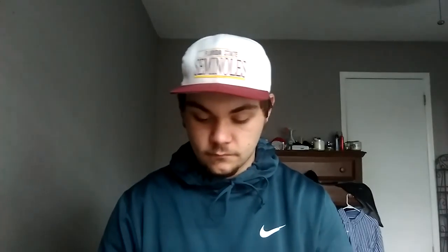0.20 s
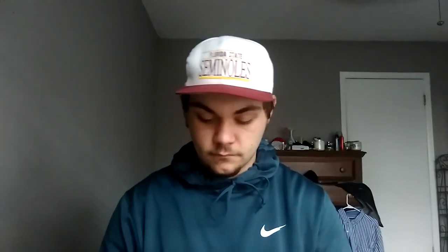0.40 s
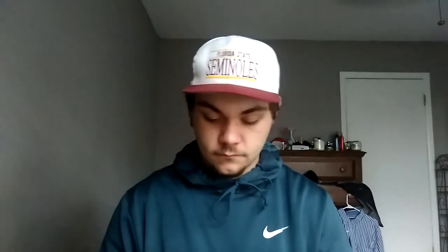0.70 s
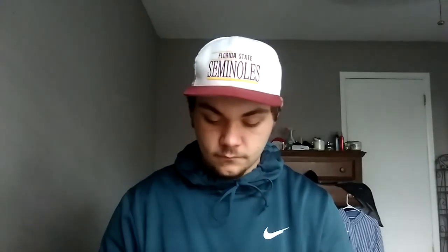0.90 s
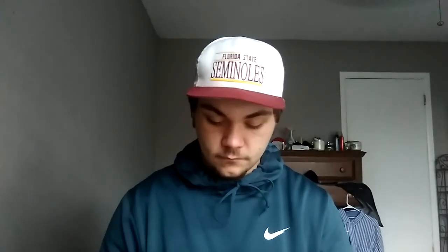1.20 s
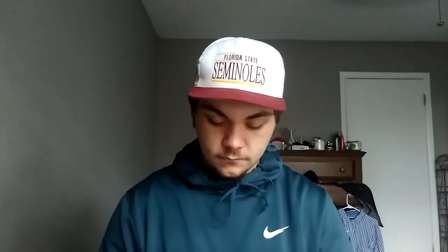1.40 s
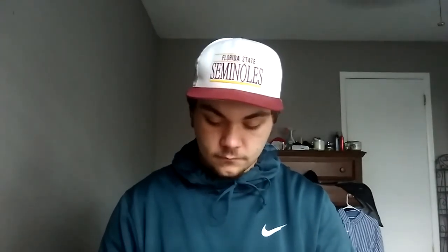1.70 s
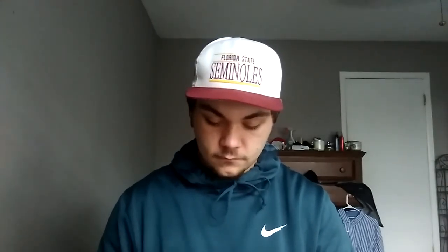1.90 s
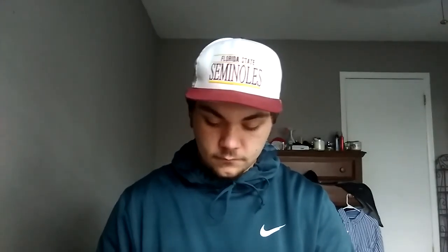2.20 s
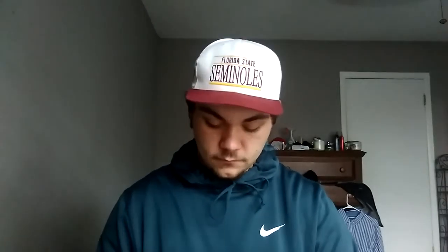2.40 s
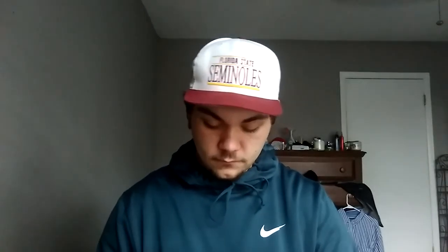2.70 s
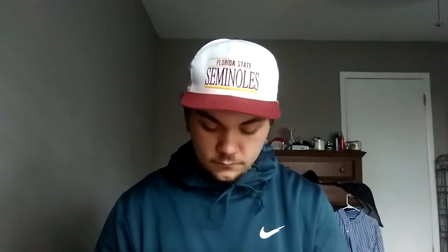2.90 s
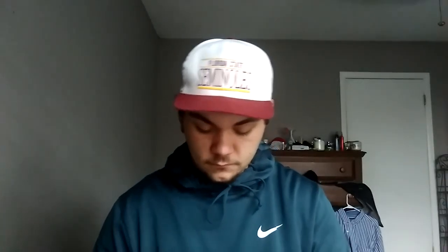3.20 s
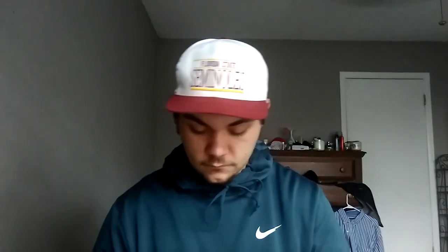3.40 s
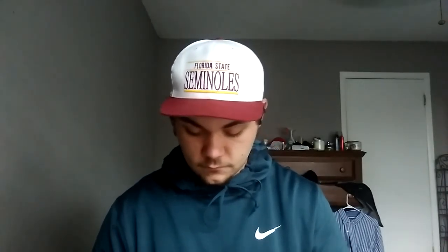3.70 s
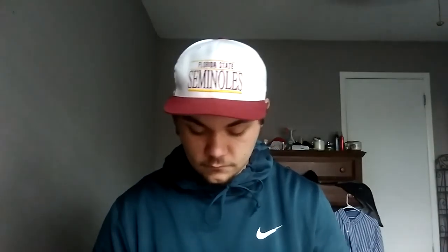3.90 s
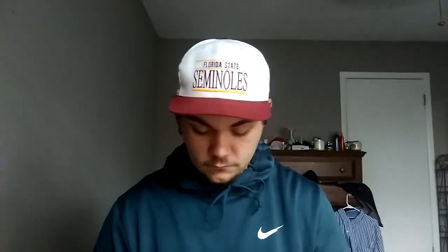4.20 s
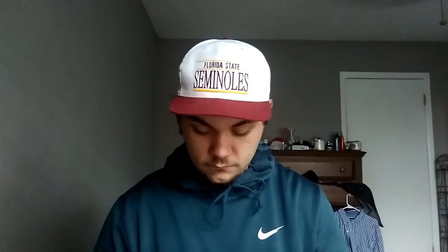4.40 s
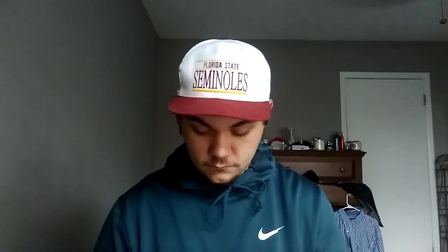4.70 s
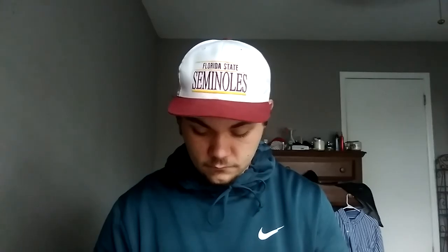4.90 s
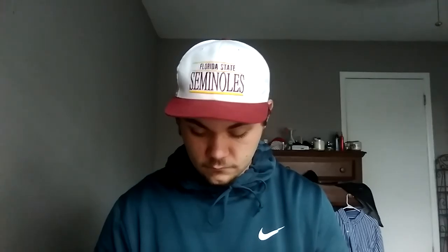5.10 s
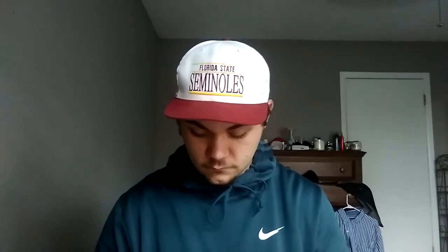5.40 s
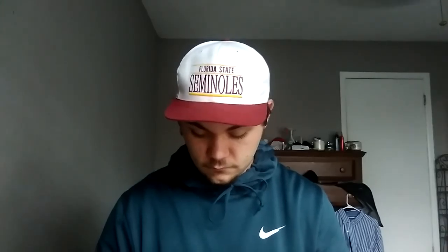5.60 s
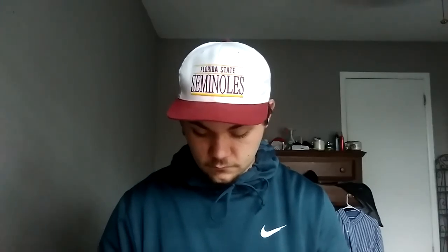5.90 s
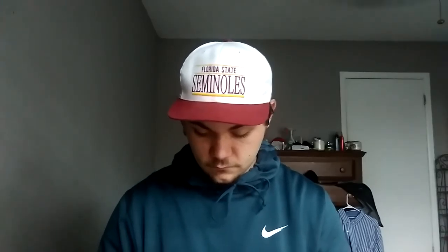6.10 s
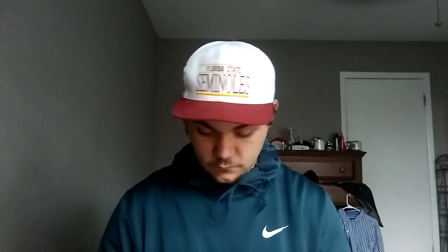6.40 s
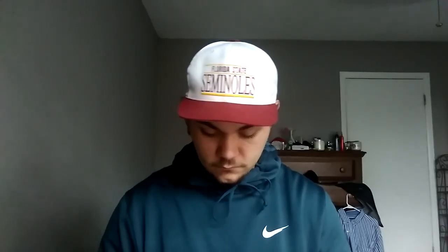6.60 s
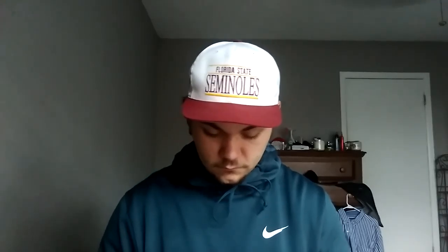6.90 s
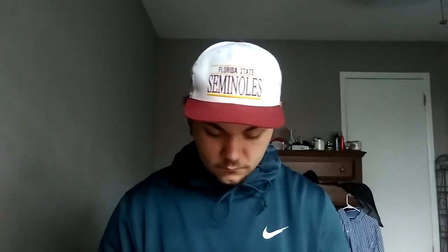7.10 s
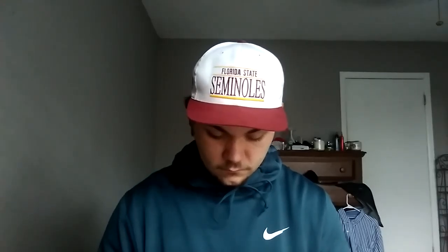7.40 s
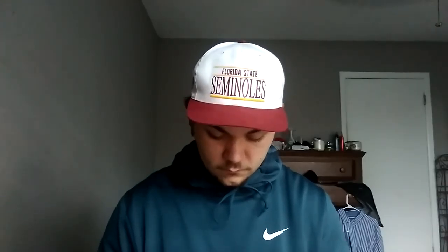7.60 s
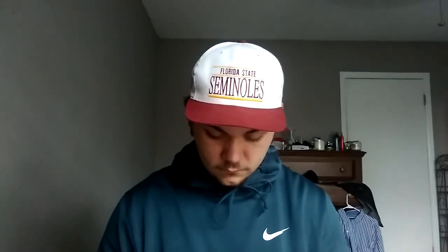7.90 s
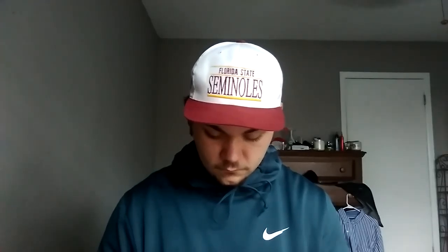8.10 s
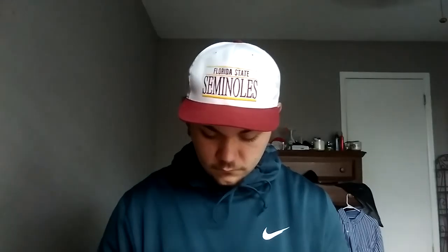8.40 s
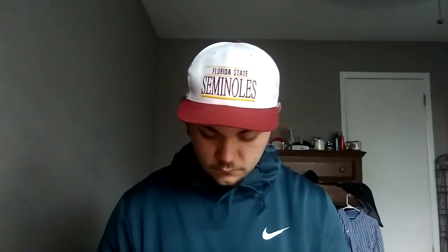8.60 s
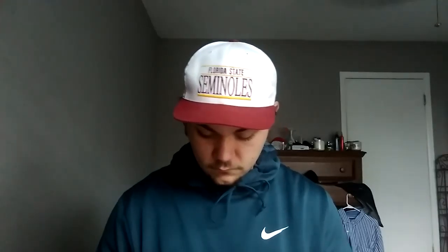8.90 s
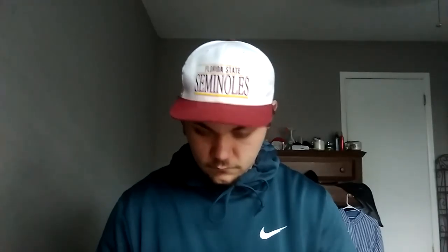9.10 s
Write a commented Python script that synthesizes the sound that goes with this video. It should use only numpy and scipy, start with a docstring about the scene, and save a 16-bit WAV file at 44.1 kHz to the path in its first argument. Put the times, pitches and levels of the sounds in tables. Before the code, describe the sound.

Hands work a paper envelope close to a small microphone in a quiet bedroom, the paper brighter and louder on the left. A short rustle and snap come at about 0.4 seconds, then the sharpest cluster of cracks at 1.2. Hissing slides and crinkles swell from 2.1 to 2.6 seconds. From 3 to 5 seconds, short uneven strokes follow one another, with crease snaps, hollow flaps of the open pocket and soft hand bumps. Stronger, bright tearing strokes come at about 5.4, 6.5 and 7.5 seconds, with small snaps between them. After 8 seconds only light sliding remains, ending just after 9. Faint mains hum and a low, steady room hush lie beneath everything. At about 6.2 seconds a motor spins up into a deep, wavering tone, strongest until 7.5 seconds, then easing and continuing to the end.

```python
"""Paper hisses, crinkles and snaps up close as hands turn and open an envelope in a quiet bedroom.
The hiss is tiny fibres catching and letting go as the paper slides and tears. The bending sheet buckles,
its creases snap, its open pocket sounds hollow, and the hands bump it softly. Behind it are mains hum,
steady room noise and a low motor that spins up towards the end. A small microphone hears all this through
two openings (ports), left and right."""
import sys
import numpy as np
from scipy import signal
from scipy.fft import rfft, irfft, next_fast_len
from scipy.io import wavfile
from scipy.ndimage import map_coordinates

SR = 44100
rng = np.random.default_rng(int(sys.argv[2]) if len(sys.argv) > 2 else 0)


def dump(signal):
    """Clip the signal to [-1, 1] and save it as 16-bit WAV at the path in sys.argv[1]."""
    limited = np.clip(np.atleast_2d(signal).T, -1, 1)
    pcm = np.round(limited * 32767).astype(np.int16)
    wavfile.write(sys.argv[1], SR, pcm)


N = 407043
T = np.arange(N) / SR

# Levels in the tables are relative: the functions add their own gains.
# hand strokes on the paper: start_s, rise_s, hold_s, hiss_db, crinkle_db, hollow_db (higher is hollower)
STROKES = [(0.035, .008, 0.023, -56, -64.5, 16), (0.297, 0.038, 0.11, -40.5, -54.5, 11),
           (0.387, 0.058, 0.025, -38.5, -44, -4), (0.733, .01, 0.033, -53.5, -85, 0),
           (1.099, 0.011, .06, -46, -62, 6), (1.177, 0.03, 0.034, -34, -49.5, 1),
           (1.29, 0.016, 0.043, -64, -50.5, 18), (1.451, .004, .06, -46.5, -61, 17),
           (1.534, 0.029, .005, -43.5, -54.5, 1), (1.62, .1, .1, -46, -57, 3),
           (1.86, 0.02, 0.1, -77, -59, 27), (2.126, 0.011, 0.013, -35.5, -46.5, -3),
           (2.187, 0.054, 0.17, -33.5, -49.5, 7), (2.425, 0.11, 0.04, -37, -50.5, -9),
           (2.606, .02, 0.058, -59, -54, 14), (2.735, 0.073, 0.089, -54.5, -82, -2),
           (2.917, 0.0069, 0.062, -43, -58, 1), (3.009, 0.006, 0.012, -39.5, -44, -14),
           (3.054, 0.024, .025, -45.5, -62, 4), (3.146, 0.03, 0.047, -45.5, -53.5, 4.5),
           (3.345, 0.029, 0.012, -42, -51, 1), (3.441, 0.034, 0.066, -35, -55, -3),
           (3.62, .02, 0.14, -58, -60.5, 0), (3.782, 0.047, 0.0058, -39.5, -48.5, -5),
           (3.994, 0.049, .03, -57, -55, 2), (4.051, 0.036, 0.027, -37.5, -48.5, 9),
           (4.157, 0.035, 0.01, -38.5, -53, -5), (4.273, 0.15, 0.044, -48, -58, 4),
           (4.451, 0.017, 0.011, -38, -51.5, -21), (4.598, 0.044, 0.025, -50, -69, -18),
           (4.783, 0.044, 0.051, -41.5, -58, -3), (4.852, 0.034, 0.016, -43, -45.5, 11.5),
           (4.971, 0.022, .03, -48, -70, 0), (5.023, .03, 0.0092, -39, -53, -2),
           (5.381, .005, .02, -35.5, -48.5, 5), (5.428, 0.13, 0.092, -32, -54.5, -24),
           (5.902, 0.0084, 0.089, -48.5, -60.5, -7), (6.008, 0.039, 0.23, -52, -78, -12),
           (6.29, 0.034, 0.17, -45, -55, -13), (6.494, 0.087, 0.087, -31.5, -47, -24),
           (6.672, 0.063, 0.039, -36, -51, -32), (6.886, 0.07, 0.17, -45.5, -58, -11),
           (7.223, 0.087, 0.057, -48, -56, 4), (7.4, 0.041, 0.1, -44, -54, -8),
           (7.466, 0.11, 0.051, -33, -49.5, -32), (7.656, 0.0094, 0.1, -42, -56.5, -11),
           (7.799, 0.045, .05, -51, -60, -7), (8.154, 0.02, 0.085, -52.5, -78, -17),
           (8.257, 0.03, 0.072, -50, -60, -12), (8.37, .03, 0.028, -54.5, -77, -2),
           (8.453, 0.076, 0.09, -53.5, -83, -5), (8.881, 0.012, 0.11, -54.5, -93, -5),
           (8.98, 0.055, .16, -50.5, -94, -8)]
# crease snaps, and faint ticks as the fingers start a stroke:
# start_s, crack_db, body_db, knock_db, ring_hz, decay_ms
SNAPS = [(0.037, -42, -69, -70, 950, 13), (0.395, -47, -39, -38, 1020, 8.6),
         (0.4197, -23, -29, -38, 1070, 6), (0.438, -29, -36, -48, 2500, 4),
         (0.448, -26, -29.5, -49, 1620, 5.1), (0.457, -39, -44, -47, 1600, 4),
         (1.222, -15, -36, -59, 5060, 3), (1.224, -12.5, -43, -49, 4950, 2.7),
         (1.231, -16.5, -37, -64, 1010, 3.7), (1.303, -47, -45.5, -66, 1500, 3),
         (1.5642, -36, -64, -63, 5000, 9.3), (1.941, -70, -54, -59, 1140, 7.4),
         (2.14, -24, -34.5, -47, 1120, 4.3), (2.148, -30, -50, -65, 4220, 9),
         (2.627, -53, -45, -49.5, 1160, 5.5), (2.971, -41, -33.5, -61, 1140, 7.5),
         (2.985, -50, -35, -41, 1150, 9.2), (3.016, -22.5, -24, -55, 1660, 4.9),
         (3.0253, -37, -28, -48, 2300, 3.3), (3.171, -34, -46, -64, 955, 7.1),
         (3.4487, -38, -63, -62, 1500, 6), (3.523, -44, -32, -42, 950, 4.5),
         (3.6387, -33, -47, -58, 2930, 4.2), (3.662, -31, -43.5, -59, 3850, 8),
         (3.834, -27.5, -45.5, -62, 1150, 16), (3.9683, -39, -46.5, -69, 1200, 3.2),
         (4.089, -45, -41.5, -50, 3200, 10), (4.4812, -19, -57, -66, 5000, 4.6),
         (4.671, -35.5, -70, -77, 900, 3), (4.8254, -34, -46.5, -61, 1790, 16),
         (5.073, -45, -41, -47, 1225, 9.4), (5.3474, -43, -77, -73, 1500, 29),
         (5.3883, -33, -47, -64, 1270, 8), (5.408, -22, -28.5, -37.5, 2600, 3.6),
         (5.4166, -34, -24.5, -39, 2850, 3.4), (5.426, -45, -30, -34.5, 3100, 7.4),
         (5.634, -46, -49, -58, 1530, 4.5), (5.9103, -34.5, -42.5, -45, 990, 5.9),
         (6.58, -25, -33, -49, 1170, 3.7), (6.9642, -33.5, -32, -38.5, 1790, 9),
         (7.104, -52, -35, -51, 3000, 5.6), (7.146, -54, -41, -53, 1140, 5.3),
         (7.216, -38.5, -39, -39.5, 1310, 5.9), (7.3841, -48, -37.5, -44.5, 2160, 6),
         (8.1774, -44, -71, -62, 900, 4.7)]
# faint finger movement between strokes: time_s, hiss_db, crinkle_db
FIDGET = [(0, -58.5, -68.5), (0.28, -61, -63.5), (0.95, -71, -79.5), (1.5, -74, -66.5), (2.08, -72, -74.5),
          (3.3, -53.5, -72), (4.2, -54.5, -61), (4.75, -62, -78.5), (5.3, -64.5, -70.5), (7.3, -64, -76),
          (8.05, -70, -77), (9.22, -80, -91)]
# soft nudges of the hands: middle_s, length_s, bump_db, rumble_db
NUDGES = [(0.09, 0.12, -50, -52), (0.316, .06, -50, -62), (0.506, 0.23, -54.5, -55), (1.18, 0.12, -48, -59),
          (1.542, 0.086, -51.5, -59), (1.764, 0.33, -50.5, -58), (2.05, 0.087, -71, -61),
          (2.405, 0.064, -65, -78), (2.663, 0.088, -56, -51), (2.987, 0.13, -53, -50),
          (3.373, 0.16, -53.5, -54), (3.622, .06, -50.5, -60), (3.745, 0.067, -48.5, -62),
          (3.946, 0.18, -50.5, -56.5), (4.178, 0.21, -53.5, -71), (4.37, 0.16, -48, -55),
          (4.534, 0.078, -54.5, -75), (4.782, 0.75, -56, -78), (5.17, 0.11, -53.5, -72),
          (5.67, 0.05, -51.5, -65), (5.77, .09, -50.5, -50), (6.11, 0.29, -65, -60),
          (6.504, 0.33, -51, -60), (6.89, 0.14, -52, -52), (7.3, 0.47, -53, -51), (7.88, 0.14, -49, -59),
          (8.315, 0.1, -50, -55), (8.62, .12, -61, -58), (8.9, .25, -75, -55)]
# a motor starting up: time_s, pitch_hz, level_db
MOTOR = [(6.2, 40, -67), (6.32, 45, -49), (6.43, 50.7, -44), (6.52, 54.8, -46), (6.65, 57.8, -35.5),
         (7.0, 59.24, -41.5), (7.38, 60.06, -36.5), (7.55, 62.35, -46.5), (8.15, 57.5, -44),
         (8.5, 61.5, -49), (9.23, 60, -50.5)]
# mains hum: pitch_hz, level_db
HUM = [(60, -64.5), (120, -56.5)]

# A colour says how strong a sound is from bass to treble.
# paper sliding: pitch_hz, level_db
SLIDE_COLOUR = [(300, -45), (1200, -40.5), (4500, -12), (6500, -4.5), (8500, -3), (16000, 0.5)]
# paper scraping under a hard stroke: pitch_hz, level_db
SCRAPE_COLOUR = [(500, -16), (1200, -13), (2400, -7), (3600, 1.5), (5500, -1.5), (8000, 0), (16000, -26)]
# a tight sheet buckling: pitch_hz, level_db
CRINKLE_COLOUR = [(500, -18), (1200, -8), (2400, -2), (3600, 0.5), (5000, 0), (6200, -5), (9000, -14.5),
                  (16000, -37)]
# the hollow of the open pocket: pitch_hz, level_db
POCKET_COLOUR = [(200, -18.5), (700, -16), (1080, -1.5), (1300, -0.5), (1500, 0.5), (2050, -4.5),
                 (2800, -8.5), (6000, -24)]
# the bright crack of a snap or tick: pitch_hz, level_db
CRACK_COLOUR = [(1500, -43), (4500, -3.5), (8000, -1), (12500, 4.5), (16000, 5.5)]
# the paper ringing beside a snap or tick: pitch_hz, level_db
SNAP_BODY_COLOUR = [(200, -29), (700, -25), (1100, 6), (1500, 2), (2500, 1.5), (4000, -1.5), (7000, -20.5),
                    (15000, -37)]
# air knocked out of the pocket: pitch_hz, level_db
KNOCK_COLOUR = [(130, -19), (280, -8), (370, 2.5), (530, 11.5), (700, 5), (950, 3), (2000, -37)]
# the envelope's broad faces flapping: pitch_hz, level_db
FLAP_COLOUR = [(120, -10.5), (245, 0.5), (320, 1), (395, -2.5), (436, 6.5), (475, -2.5), (520, 2.5),
               (640, -8), (820, -2.5), (1250, -15), (2500, -30)]
# a soft bump of the hand: pitch_hz, level_db
BUMP_COLOUR = [(60, -23), (95, -5), (108, -8), (122, 9.5), (135, -2), (172, -5.5), (196, -8.5),
               (240, -13.5), (600, -50)]
# deep rumble from handling: pitch_hz, level_db
RUMBLE_COLOUR = [(20, -33), (33, -29), (44, 16), (53, 3), (66, 8), (80, -3), (94, 3), (112, -7), (250, -61)]
# the room's steady noise: pitch_hz, level_db
ROOM_COLOUR = [(22, -11), (40, -1.5), (54, 15), (80, 7.5), (130, -0.5), (210, 1.5), (390, -8), (436, -8.5),
               (480, -1), (650, -5), (850, -11.5), (1400, -14.5), (3000, -22.5), (6500, -82), (16000, -53)]
# the microphone's own hiss: pitch_hz, level_db
MIC_HISS_COLOUR = [(100, 10.5), (14000, 0)]
# the left port faces the paper and rings in the treble: pitch_hz, gain_db
LEFT_PORT = [(100, 1), (6000, -0.5), (8500, 4.5), (10400, 5.5), (11300, 9), (11900, 12), (12600, 9.5),
             (13400, 6.5), (14500, -1), (16000, -1.5)]
# the right port is shaded: pitch_hz, gain_db
RIGHT_PORT = [(100, -4), (400, -5.5), (1500, -4), (4000, -4), (6000, -6.5), (9500, -11.5), (12500, -15),
              (16000, -41.5)]
# how alike the paper sounds at the two ports: pitch_hz, likeness_0_to_1
LIKENESS = [(300, .65), (1500, 0.52), (5000, 0.28), (12000, 0)]

GRIP_S, GRIP_DB = 0.0076, -10.5  # a stroke grips below its full level
TIRE_DB_PER_S, RELEASE_DB_PER_S = 17.5, 194  # it fades slowly while held, quickly once let go
LINGER_DB, LINGER_DB_PER_S = -19, 71  # the paper goes on shifting after each stroke
SETTLE_DB, SETTLE_DB_PER_S = -13.5, 380  # crinkle after a snap or tick, relative to its body_db
RESTING_BUMP_DB, RESTING_RUMBLE_DB = -67, -64  # hands at rest
ECHO_S, TREBLE_ECHO_S = 0.35, 0.094  # time for the room's echo to fall by 60 dB


def envelope():
    """All the sound that one face of the paper gives off."""
    slide_db, flex_db, hollow = handling()
    return sliding(slide_db) + crinkling(flex_db, hollow) + snapping() + flapping(flex_db, hollow)


def sliding(level_db, slips_per_s=15000, hiss_db=-3.5, scrape_db=-14.5, bite=0.53):
    """Fibres catch and let go, more often as the paper moves faster; hard strokes add a lower scrape."""
    force_db = level_db + 40
    grain = clicks(slips_per_s * undb(0.5 * force_db), spread_db=1.5)
    grain = grain * undb(level_db + 0.9 * wander(per_s=130))
    hiss = undb(hiss_db) * colour(grain, SLIDE_COLOUR)
    scrape = colour(grain * undb(scrape_db + bite * force_db), SCRAPE_COLOUR)
    hiss = bending(hiss, depth_db=3.5, per_s=16, width_hz=190)
    return hiss + bending(scrape, depth_db=15.5, per_s=12, width_hz=190)


def crinkling(level_db, hollow, buckles_per_s=900, cluster_db=1.5, crisp_db=-1.5, pocket_db=-5):
    """Small buckles come in clusters; a tight sheet sounds crisp, a bulging pocket hollow."""
    buckles = clicks(buckles_per_s * undb(0.4 * (level_db + 50)), spread_db=3.0)
    buckles = buckles * undb(level_db + cluster_db * wander(per_s=70))
    buckles = buckles * np.sqrt(2 / (1 + hollow ** 2))  # crisp and hollow share the power
    crisp = undb(crisp_db) * colour(buckles, CRINKLE_COLOUR)
    pocket = undb(pocket_db) * colour(buckles * hollow, POCKET_COLOUR)
    return bending(crisp + pocket, depth_db=11, per_s=16, width_hz=180)


def snapping(knock_ms=13, ring_sharpness=6, size=4096):
    """A crease snaps or a stroke starts with a tick: a bright crack, a papery ring, a hollow knock."""
    crack, body, knock = np.zeros((3, N + size))
    ms = 1000 * np.arange(size) / SR
    for start_s, crack_db, body_db, knock_db, ring_hz, decay_ms in SNAPS:
        # faint ticks start more softly than loud snaps
        rise_ms = 0.15 * undb(-0.64 * (max(crack_db, body_db) + 29.5))
        burst = np.minimum(ms / rise_ms, 1) * np.exp(-(ms / decay_ms) ** 0.96)
        tear, push, air = rng.standard_normal((3, size))
        ring = signal.lfilter(*signal.iirpeak(ring_hz, ring_sharpness, fs=SR), push * burst)
        i = int(start_s * SR)
        crack[i:i + size] += undb(crack_db) * tear * burst
        body[i:i + size] += undb(body_db) * (0.91 * push * burst + ring)
        knock[i:i + size] += undb(knock_db) * air * np.exp(-ms / knock_ms)
    return (undb(-6) * colour(crack[:N], CRACK_COLOUR)
            + undb(-1) * colour(body[:N], SNAP_BODY_COLOUR)
            + undb(-1) * colour(knock[:N], KNOCK_COLOUR))


def flapping(flex_db, hollow, gain_db=-57.0, follow=0.27, nudge_db=-7, uneven_db=2):
    """The envelope's broad faces sound hollow when the open pocket is bent or nudged."""
    pocket_share = hollow ** 2 / (1 + hollow ** 2)
    pocket_db = flex_db + 10 * np.log10(pocket_share) + 55
    bump, _ = nudging()
    push = np.hypot(undb(gain_db + follow * pocket_db), undb(nudge_db) * bump)
    taps = clicks(per_s=1500, spread_db=3.15) * push * undb(uneven_db * wander(per_s=25))
    return bending(colour(taps, FLAP_COLOUR), depth_db=7, per_s=11, width_hz=90.5)


def handling(step=32):
    """Fidgeting, strokes and settling paper set the hiss level, crinkle level and hollowness."""
    t = T[::step]
    slide, flex = (undb(db[::step]) ** 2 for db in curves(FIDGET))
    crisp, hollow = flex / 2, flex / 2
    for start_s, rise_s, hold_s, hiss_db, crinkle_db, hollow_db in STROKES:
        power = stroke(t - start_s, rise_s, hold_s)
        slide = slide + power * undb(hiss_db) ** 2
        hollow_ratio = undb(hollow_db) ** 2
        tight = power * undb(crinkle_db) ** 2 / (1 + hollow_ratio)
        crisp, hollow = crisp + tight, hollow + tight * hollow_ratio
    for start_s, _, body_db, *_ in SNAPS:
        settling_db = body_db + SETTLE_DB - SETTLE_DB_PER_S * np.abs(t - start_s)
        settling = (t > start_s) * undb(settling_db) ** 2
        crisp, hollow = crisp + settling / 2, hollow + settling / 2
    slide_db, flex_db = 10 * np.log10(slide), 10 * np.log10(crisp + hollow)
    return [np.interp(T, t, curve) for curve in (slide_db, flex_db, np.sqrt(hollow / crisp))]


def stroke(t, rise_s, hold_s):
    """Power of one stroke, t seconds after the fingers grip: it builds, tires, then lets go."""
    since_peak = np.maximum(t - rise_s, 0)
    since_release = np.maximum(since_peak - hold_s, 0)
    build_db = GRIP_DB * np.clip(1 - t / rise_s, 0, 1)
    tire_db = -TIRE_DB_PER_S * np.minimum(since_peak, hold_s)
    release_db = np.maximum(-RELEASE_DB_PER_S * since_release, LINGER_DB - LINGER_DB_PER_S * since_release)
    return (np.clip(t / GRIP_S, 0, 1) * undb(build_db + tire_db + release_db)) ** 2


def bending(x, depth_db, per_s, width_hz, size=512):
    """As the sheet changes shape and place, some pitches drop out and others swell."""
    hz, t, spectrum = signal.stft(x, SR, nperseg=size)
    chance = rng.standard_normal((200, 400))
    place = np.meshgrid(hz / width_hz, t * per_s, indexing="ij")
    ripple = map_coordinates(chance, place, order=3, mode="mirror")
    # sound paths can cancel each other fully, but add up only a little
    gain = undb(depth_db * np.minimum(ripple, np.tanh(ripple)))
    return signal.istft(spectrum * unit(gain), SR, nperseg=size)[1][:N]


def bumping(bump_db=4.0, rumble_db=2):
    """The hands nudge things about, which makes them thud and rumble."""
    bump, rumble = nudging()
    thuds = colour(clicks(per_s=1500, spread_db=1.7) * bump, BUMP_COLOUR)
    rumbles = colour(clicks(per_s=1500, spread_db=0.97) * rumble, RUMBLE_COLOUR)
    return undb(bump_db) * thuds + undb(rumble_db) * rumbles


def nudging(step=128):
    """Strength of the bumps and of the rumble: each nudge swells and fades above the resting level."""
    t = T[::step]
    bump, rumble = undb(RESTING_BUMP_DB) ** 2, undb(RESTING_RUMBLE_DB) ** 2
    for middle_s, length_s, bump_db, rumble_db in NUDGES:
        swell = np.exp(-(2 * (t - middle_s) / length_s) ** 2)
        bump = bump + swell * undb(bump_db) ** 2
        rumble = rumble + swell * undb(rumble_db) ** 2
    return [np.interp(T, t, np.sqrt(power)) for power in (bump, rumble)]


def motor():
    """A motor strains up to speed and then eases: one low, wavering tone."""
    pitch_hz, level_db = curves(MOTOR)
    phase = 2 * np.pi * np.cumsum(pitch_hz) / SR
    return np.sqrt(2) * undb(level_db + 1.1 * wander(per_s=4.6)) * np.sin(phase)


def mains_hum():
    """The electricity supply hums with low tones that waver a little in level."""
    tones = (undb(db + 0.53 * wander(per_s=7.6)) * np.sin(2 * np.pi * hz * T) for hz, db in HUM)
    return np.sqrt(2) * sum(tones)


def room_noise(level_db):
    """The steady, low hush of the bedroom."""
    return undb(level_db) * colour(rng.standard_normal(N), ROOM_COLOUR)


def bedroom_echo(x, echo_db=-6.5, treble_db=-5, split_hz=5000):
    """The room adds a short echo whose treble dies first."""
    t = T[:SR // 2]
    noise = rng.standard_normal(len(t))
    low = signal.sosfilt(signal.butter(2, split_hz, fs=SR, output="sos"), noise)
    high = signal.sosfilt(signal.butter(2, split_hz, "high", fs=SR, output="sos"), noise)
    fall = np.log(1000)  # 60 dB
    tail = low * np.exp(-fall * t / ECHO_S) + undb(treble_db) * high * np.exp(-fall * t / TREBLE_ECHO_S)
    fade_in = np.minimum(t / 0.00085, 1)
    tail_energy = SR * ECHO_S / (2 * fall)
    return undb(echo_db) * convolve(x, tail * fade_in / np.sqrt(tail_energy))


def blend(near, far):
    """Mix two unrelated sounds so that the mix resembles the first, less so in the treble."""
    hz, likeness = np.transpose(LIKENESS)
    size = next_fast_len(N)
    alike = np.clip(np.interp(np.fft.rfftfreq(size, 1 / SR), hz, likeness), 0, 1)
    return irfft(alike * rfft(near, size) + np.sqrt(1 - alike ** 2) * rfft(far, size), size)[:N]


def clicks(per_s, spread_db):
    """Tiny clicks at random moments, mostly small and a few large, with an average power of 1."""
    chance = np.clip(per_s / SR, 1e-4, 1)
    sizes = undb(spread_db * np.clip(rng.standard_normal(N), -2.5, 2.5))
    happens = rng.random(N) < chance
    return unit(happens * sizes * rng.choice([-1, 1], N) / np.sqrt(chance))


def wander(per_s):
    """A random drift of roughly 1 either way that turns per_s times a second."""
    steps = rng.standard_normal(N // 20)
    return 1.13 * np.interp(T * per_s, np.arange(len(steps)), steps)


def colour(x, points):
    """Give plain noise or clicks a colour while keeping their power."""
    ring = response(points)
    return convolve(x, ring / np.linalg.norm(ring))


def response(points, size=8192):
    """What one click becomes after a filter with this colour (its impulse response)."""
    hz, db = np.transpose(points)
    grid_hz = np.maximum(np.arange(size // 2 + 1) * SR / size, 1)
    gain = undb(np.interp(np.log(grid_hz), np.log(hz), db))
    cepstrum = irfft(np.log(gain))
    # fold it so that the filter rings only after the click, never before
    cepstrum[1:size // 2] *= 2
    cepstrum[size // 2 + 1:] = 0
    return irfft(np.exp(rfft(cepstrum)))


def convolve(x, ring):
    """Pass a sound through a filter, given as its response to one click."""
    return signal.fftconvolve(x, ring)[:N]


def curves(rows):
    """The columns of a table, joined by straight lines in time."""
    time_s, *columns = np.transpose(rows)
    return [np.interp(T, time_s, column) for column in columns]


def undb(db):
    """Turn decibels into a number to multiply by."""
    return 10 ** (np.asarray(db) / 20)


def unit(x):
    """Scale to an average power of 1."""
    return x / np.sqrt(np.mean(x ** 2) + 1e-20)


def scene(paper_db=-0.42, room_db=-61.0):
    """The left port hears the paper's near face, the right a blend of both; the bass is mostly shared."""
    near, far = envelope(), envelope()
    sides = [near, blend(near, far)]
    shared = bumping() + motor() + mains_hum() + room_noise(room_db)
    paper = np.array([side + bedroom_echo(side) for side in sides])
    unshared = np.array([room_noise(room_db - 2) + undb(-11) * bumping() for _ in sides])
    return undb(paper_db) * paper + shared + unshared


def record(dry, hiss_db=-72.5, top_hz=15720):
    """Each port colours the sound and the right one flips it; faint hiss joins; top treble is cut."""
    left = convolve(dry[0], response(LEFT_PORT))
    right = -convolve(dry[1], response(RIGHT_PORT))
    hiss = np.array([colour(rng.standard_normal(N), MIC_HISS_COLOUR) for _ in range(2)])
    treble_cut = signal.ellip(12, 0.2, 70, top_hz, fs=SR, output="sos")
    return signal.sosfilt(treble_cut, np.array([left, right]) + undb(hiss_db) * hiss)


dry = scene()
out = record(dry)
dump(out)
```